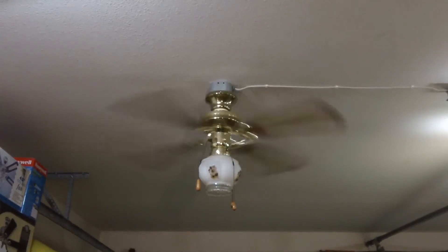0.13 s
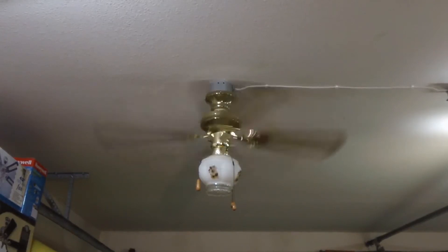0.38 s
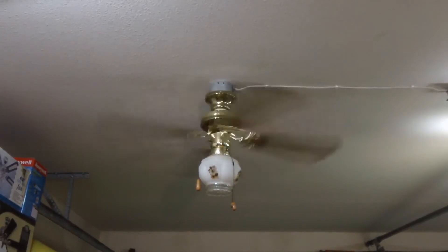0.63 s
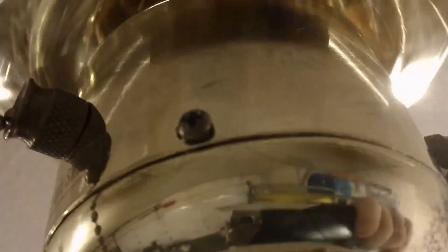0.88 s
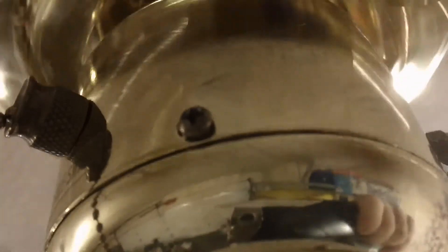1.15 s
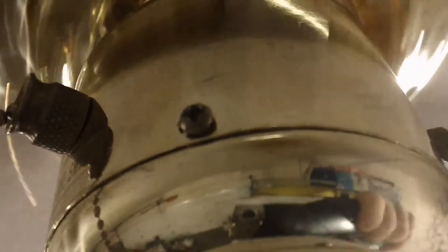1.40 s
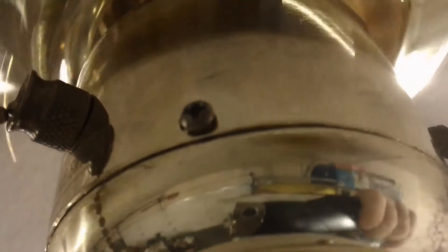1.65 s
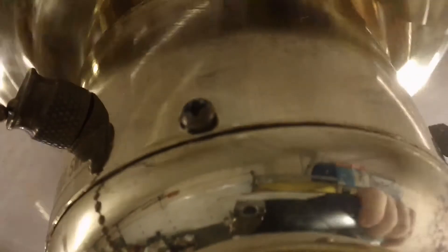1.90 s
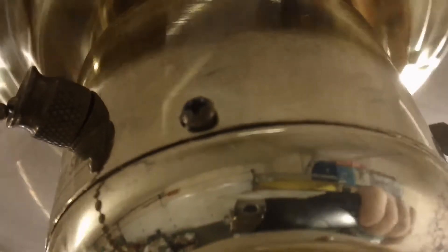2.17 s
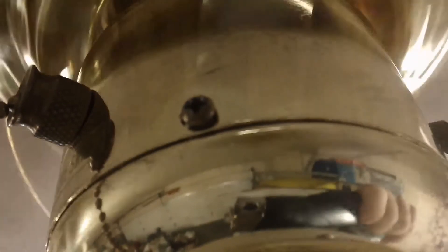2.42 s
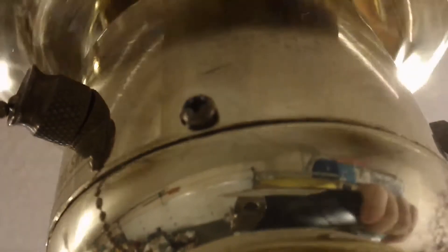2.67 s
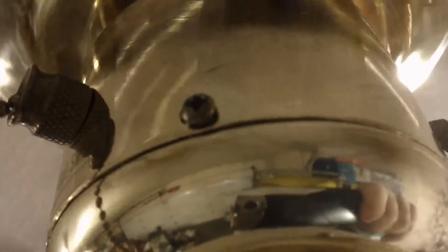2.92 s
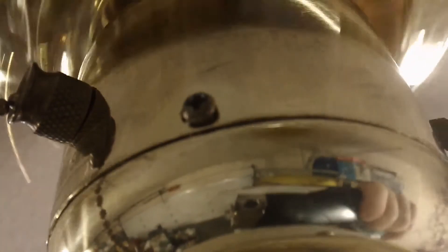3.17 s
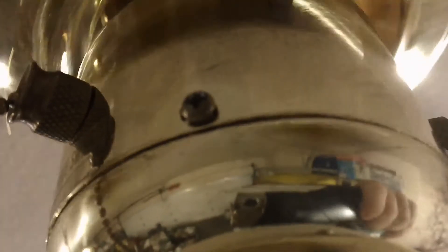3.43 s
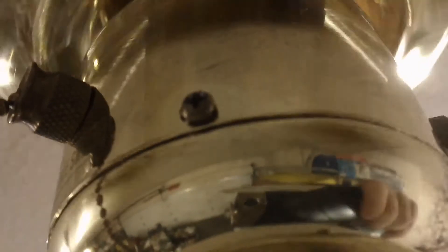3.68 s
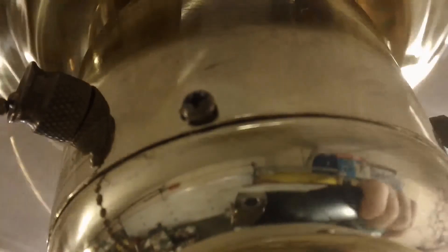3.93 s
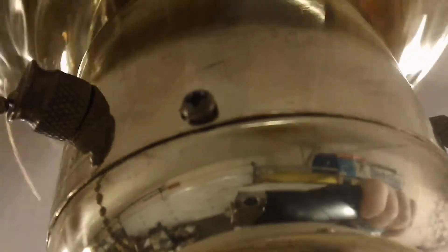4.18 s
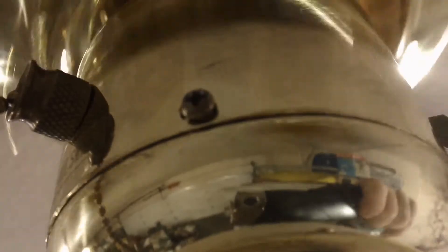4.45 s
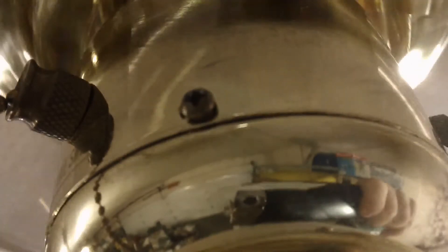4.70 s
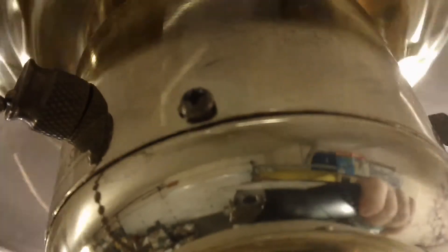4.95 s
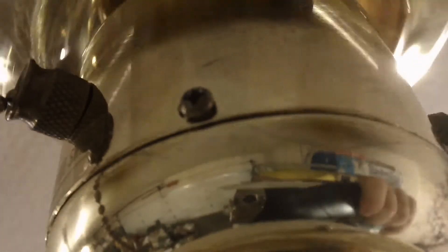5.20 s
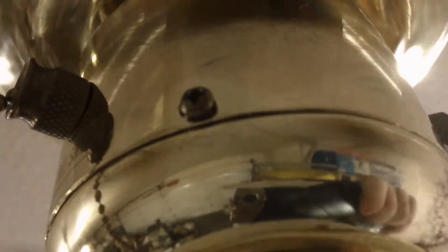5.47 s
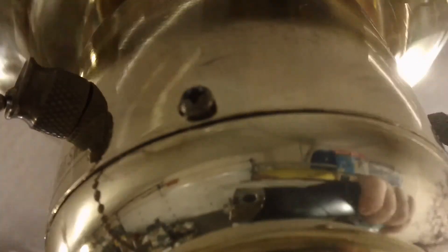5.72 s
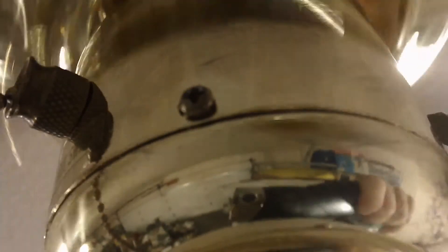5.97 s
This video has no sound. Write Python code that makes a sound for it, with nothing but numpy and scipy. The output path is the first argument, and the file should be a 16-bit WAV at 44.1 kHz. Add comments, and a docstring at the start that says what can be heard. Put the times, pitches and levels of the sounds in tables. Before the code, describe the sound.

Distant fan hiss, a short gap of silence, then a close motor hum swelling with each turn, with bearing rumble, small rattles and draught thumps.

```python
"""Ceiling fan, far and near

A ceiling fan is heard first from across the room, then, after a short silent gap, at its brass motor housing.
The windings hum at twice the mains rate, swelling once a turn up close; rotor slots and blades add lines.
Bearing noise rings the housing, shaped noise hisses as air, and short noise bursts make ticks and rattles.
Draughts buffet the microphone as gusty low noise with single thumps; faint hiss alone widens the stereo."""
import sys
import numpy as np
from scipy import signal
from scipy.fft import rfft, irfft, next_fast_len
from scipy.io import wavfile
from scipy.ndimage import uniform_filter1d

SR = 44100
rng = np.random.default_rng(int(sys.argv[2]) if len(sys.argv) > 2 else 0)


def materialize(psi):
    """Save the field psi as 16-bit PCM at rate SR to the path in sys.argv[1].

    A 1-D psi becomes a single channel; in a 2-D psi each row is a channel.
    """
    bounded = np.clip(np.atleast_2d(psi).T, -1, 1)
    quanta = np.round(bounded * 32767).astype(np.int16)
    wavfile.write(sys.argv[1], SR, quanta)


def ratio(d):
    """dB to gain"""
    e = np.asarray(d, float) / 20
    return 10 ** e


N = 268789  # length in samples

HUM_HZ, TURN_HZ, SLOT_HZ, BLADES = 119.92, 2.67, 142.26, 4
GAP_START_S, GAP_END_S = 0.618, 0.7653

# across the room: gains of air, hum and housing (dB)
FAR_AIR_DB, FAR_HUM_DB, FAR_HOUSING_DB = 2.5, -47, -9.5
# at the housing: settled gains (dB), then how far under them each starts (dB) and the rise time (s)
NEAR_AIR_DB, NEAR_HUM_DB, NEAR_HOUSING_DB = 2, -33, 0.22
FADE_AIR_DB, FADE_HUM_DB, FADE_HOUSING_DB, FADE_S = -10.5, -10.5, -9, 1.055


def level(x, db):
    """Set the rms level."""
    return x * ratio(db) / np.sqrt(np.mean(x ** 2))


def coloured(spectrum):
    """Noise shaped by a (Hz, dB) spectrum."""
    hz, db = np.transpose(spectrum)
    size = next_fast_len(N)
    log_hz = np.log(np.arange(size // 2 + 1) * SR / size + 1)
    shape = ratio(np.interp(log_hz, np.log(hz), db))
    return irfft(rfft(rng.standard_normal(size)) * shape, size)[:N]


def ring(x, hz, width_hz):
    """One resonance, gain 1 at its centre."""
    return signal.lfilter(*signal.iirpeak(hz, hz / width_hz, fs=SR), x)


def band(x, lo_hz, hi_hz):
    """Steep band-pass."""
    return signal.sosfilt(signal.butter(4, [lo_hz, hi_hz], "band", fs=SR, output="sos"), x)


def knock(noise, rise_s, fall_s):
    """A burst of noise with a soft rise and an exponential fall."""
    u = np.arange(len(noise)) / SR
    return noise * (1 - np.exp(-u / rise_s)) * np.exp(-u / fall_s)


def walk(rate):
    """Random levels held 1 / rate s and slewed twice; spread near 1."""
    k = int(SR / rate)
    steps = np.repeat(rng.standard_normal(N // k + 1), k)
    return 1.39 * uniform_filter1d(uniform_filter1d(steps, k), k)[:N]


def swell(t, depth, peak_s):
    """The unbalanced rotor leans towards the microphone once a turn."""
    return 1 + depth * np.cos(2 * np.pi * TURN_HZ * (t - peak_s))


def add(out, s, grain):
    """Mix a grain in from time s."""
    i = max(int(s * SR), 0)
    out[i:i + len(grain)] += grain[:len(out) - i]


# Hum overtones, levels relative to the hum gain.
# Columns: multiple, level_db, swell_depth (0-1, near only), swell_peak_s, waver_db
HUM_OVERTONES = [(1, 0.5, 0.3, 0.33, 0.9), (2, -13.5, 0.4, 0.27, 1.2), (4, -34, 0.55, 0.36, 2.5)]
# Rotor slot tone mixed with the hum, levels relative to the hum gain.
# Columns: hum_multiples_added, level_db, swell_depth (0-1)
SLOT_TONES = [(0, -30.5, 0), (1, -20, 0), (2, -22, 0.28), (3, -31.5, 0.37), (5, -37, 0.3), (7, -38, 0.05)]
# Third overtone, which drifts on its own, outside the hum gain. Columns: time_s, level_db
THIRD_OVERTONE = [(.77, -69), (1.75, -65), (2.4, -57), (3.2, -58), (3.8, -57), (4.3, -51.5), (4.8, -50),
                  (5.3, -54.5), (5.7, -66), (6.09, -62)]
BLADE_TONE_DB = -23.5  # relative to the hum gain
LEAD_RAD = 0.52  # each overtone runs this much further ahead of the trough
FAR_DULL_DB, FAR_SECOND_DB = -3, -8  # far loss of overtones and slot tones; extra loss of the second


def windings(t, cycle, near, hum_db):
    """Magnetic pull: overtones gather near the troughs, which come out sharp; slots and blades add lines."""
    dull_db = np.where(near, 0, FAR_DULL_DB)
    tone = np.zeros(N)
    for k, db, depth, peak_s, waver_db in HUM_OVERTONES:
        far_db = (k > 1) * dull_db + (k == 2) * ~near * FAR_SECOND_DB
        gain = ratio(db + far_db + waver_db * walk(9)) * swell(t, near * depth, peak_s)
        tone += gain * np.cos(k * cycle + (k - 1) * LEAD_RAD)
    slot = 2 * np.pi * SLOT_HZ * t
    for k, db, depth in SLOT_TONES:
        gain = ratio(db + dull_db + 1.4 * walk(12)) * swell(t, depth, 0.24)
        tone += gain * np.cos(slot + k * cycle)
    # blades passing put one line just above the hum
    tone += ratio(BLADE_TONE_DB) * np.cos(cycle + 2 * np.pi * BLADES * TURN_HZ * (t - 0.021))
    third_db = np.interp(t, *np.transpose(THIRD_OVERTONE)) + 2.2 * walk(9)
    third = ratio(third_db) * np.cos(3 * cycle + 2 * LEAD_RAD)
    return -np.sqrt(2) * (ratio(hum_db) * tone + third)


# Resonances of the brass shell. Column: pitch_hz
SHELL_HZ = [248, 269, 630, 742, 905, 1004, 1046, 1105, 1380, 1490, 1573, 1603, 1625, 2622]
# The same resonances in order, levels relative to the housing gain.
# Columns: width_hz, level_db, swell_depth (0-1)
SHELL_MODES = [(16, -56, 0), (12, -65.5, 0), (54, -70.5, 0.3), (40, -66.5, 0.5), (15, -72.5, 0),
               (9.95, -70, 0.7), (14, -70.5, 0.3), (50, -70, 0), (50, -66, 0), (50, -69, 0.08),
               (11, -69.5, 0.8), (10.04, -77.5, 0.3), (18, -76, 0.5), (6, -79.5, 0)]
# Spectrum shape of the broad rumble. Columns: pitch_hz, density_db (per Hz)
RUMBLE_SPECTRUM = [(90, -13.5), (180, -11.5), (300, -13.5), (600, -16), (1200, -19.5), (1700, -34),
                   (1900, -48.5), (2500, -58.5)]
RUMBLE_DB = -56  # rms before swell, waver and the housing gain


def housing(t, cycle):
    """Bearing noise, pulsed a little by the hum, rings the brass shell over a broad rumble."""
    drive = rng.standard_normal(N) * (1 + 0.33 * np.cos(cycle))
    shell = np.zeros(N)
    for hz, (width_hz, db, depth) in zip(SHELL_HZ, SHELL_MODES):
        shell += swell(t, depth, 0.33) * level(ring(drive, hz, width_hz), db)
    rumble = level(coloured(RUMBLE_SPECTRUM), RUMBLE_DB)
    return shell + swell(t, 0.21, 0.32) * ratio(0.7 * walk(6)) * rumble


# Spectrum shape of the blade hiss. Columns: pitch_hz, density_db (per Hz)
AIR_SPECTRUM = [(30, -22), (100, -2.5), (300, -1), (1000, -9), (2000, -13.5), (4000, -16.5), (8000, -20),
                (10000, -22.5), (12000, -34.5), (13000, -32.5), (14800, -22.5), (15300, -25)]
AIR_DB = -53.5  # rms before flicker and the air gain


def air(cycle):
    """Hiss of the blades, faintly buzzing with the hum and flickering."""
    buzz = 1 + 0.035 * np.cos(cycle)
    flicker_db = 0.5 * walk(5.18) + 0.83 * walk(24.98)
    return buzz * ratio(flicker_db) * level(coloured(AIR_SPECTRUM), AIR_DB)


# Spectrum shape of the stereo hiss. Columns: pitch_hz, density_db (per Hz)
SIDE_SPECTRUM = [(150, -34), (290, -13.5), (460, 3), (1250, -2), (1900, -1), (5000, 0), (10000, -4.5),
                 (11400, -3), (12600, -18.5), (15300, 2)]
SIDE_DB = -62.5  # rms before the air gain


def side_hiss():
    """Steady noise, added to the left and subtracted from the right for width."""
    return level(coloured(SIDE_SPECTRUM), SIDE_DB)


# Spectrum shape of the draught. Columns: pitch_hz, density_db (per Hz)
DRAUGHT_SPECTRUM = [(15, -40), (30, -13), (65, -3.5), (95, -3.5), (160, -5.5), (200, -11.5), (260, -27.5),
                    (400, -57.5)]
# Draught strength. Columns: time_s, gain_db
DRAUGHT_GUSTS = [(0, -73), (0.78, -67.5), (1.5, -58.5), (2.85, -52.5), (3.55, -67), (3.9, -57), (4.3, -61),
                 (4.67, -49.5), (5.1, -57), (5.85, -53), (6.09, -47.5)]


def draught(t):
    """Turbulent draught from the blades rumbles on the microphone in gusts."""
    gust_db = np.interp(t, *np.transpose(DRAUGHT_GUSTS)) + 2.3 * walk(16)
    return ratio(gust_db) * level(coloured(DRAUGHT_SPECTRUM), 4.2)


# Short rattles; knock level is set before the resonances.
# Columns: start_s, length_s, knock_db, low_resonance_db, high_resonance_db
RATTLE_EVENTS = [(.035, .03, -46, 2, -10), (1.17, .07, -53, -2, -10), (1.9166, .038, -33, 4, -1),
                 (4.052, .07, -37, -4, -5), (4.177, .03, -38, -2, -6), (4.377, .03, -38, -3, -4),
                 (4.485, .04, -36.5, -2, -4), (5.094, .048, -36, 0, -4), (5.178, .022, -38, 3, -10),
                 (5.21, .02, -38, -3, -2)]
# Low, middle and high resonances of the loose part. Columns: pitch_hz, width_hz
RATTLE_MODES = [(3700, 1200), (6000, 1500), (9900, 1600)]
RUSTLE_DB = -57  # before the resonances


def rattles():
    """A loose part knocks on every hum cycle for a moment, rustling between the knocks."""
    out = np.zeros(N)
    for s, length_s, db, low_db, high_db in RATTLE_EVENTS:
        size = int((length_s + 0.02) * SR)
        hits = ratio(RUSTLE_DB) * np.hanning(size) * rng.standard_normal(size)
        for k in range(int(length_s * HUM_HZ) + 1):
            burst = knock(rng.standard_normal(300), 0.0005, 0.0014)
            add(hits, k / HUM_HZ, ratio(db + 1.2 * rng.standard_normal()) * burst)
        for (hz, width_hz), mode_db in zip(RATTLE_MODES, (low_db, -3, high_db)):
            add(out, s, ratio(mode_db) * ring(hits, hz, width_hz))
    return band(out, 2600, 10800)


# Runs of evenly spaced ticks, about one run a turn. Columns: first_s, tick_count, spacing_s
TICK_TIMES = [(.0623, 3, .0551), (.3401, 3, .0559), (.8131, 4, .0613), (1.1653, 2, .0681),
              (1.4092, 2, .0554), (1.6332, 4, .0585), (1.985, 4, .0604), (2.3501, 4, .0557),
              (2.6863, 3, .0568), (2.8784, 1, 0), (3.0455, 2, .0623), (3.3837, 4, .0567), (3.7519, 4, .064),
              (4.1165, 1, 0), (4.4423, 1, 0), (4.5855, 2, .0608), (4.8349, 3, .0562), (5.248, 3, .0582),
              (5.5523, 2, .0718), (5.8696, 4, .0608)]
TICK_DB, TICK_SCATTER_DB = -44.5, 1.0  # peak before the air gain, and its random spread
TICK_LOW_HZ, TICK_HIGH_HZ = 4500, 8500  # range of the bright centre


def ticks():
    """A loose part ticks: each is a millisecond or two of treble with a brighter centre."""
    out = np.zeros(N)
    for first_s, count, spacing_s in TICK_TIMES:
        for k in range(count):
            burst = knock(rng.standard_normal(400), 0.00079, 0.0012)
            hz = rng.uniform(TICK_LOW_HZ, TICK_HIGH_HZ)
            burst = burst + 0.37 * ring(burst, hz, 1500) + 0.5 * ring(burst, 3500, 630)
            burst = band(burst, 2700, 9500)
            gain = ratio(TICK_DB + TICK_SCATTER_DB * rng.standard_normal())
            add(out, first_s + k * spacing_s, gain * burst / np.abs(burst).max())
    return out


# Thumps of air on the microphone; level is the peak of the main wave.
# Columns: centre_s, level_db, pitch_hz, spread_ms (standard deviation of the bell-shaped envelope)
AIR_THUMPS = [(1.274, -38, 80, 7.1), (1.561, -39, 110, 8), (1.923, -24.5, 86, 2.9), (2.248, -44, 95, 6),
              (2.707, -35, 90, 6.5), (2.865, -31, 70, 7.4), (2.905, -38, 90, 4.9), (3.133, -31, 70.4, 7.5),
              (3.847, -40, 90, 5.9), (4.836, -42, 80, 7.7), (5.227, -39, 70, 6.5), (5.508, -36, 79, 6.9),
              (6.041, -37, 85, 8.7)]


def buffets():
    """The strongest eddies of the draught are dull thumps of a cycle or so with a tighter edge."""
    out = np.zeros(N)
    u = np.arange(-2000, 2000) / SR
    for s, db, hz, spread_ms in AIR_THUMPS:
        bell = np.exp(-0.5 * (1000 * u / spread_ms) ** 2)
        wave = np.cos(2 * np.pi * hz * u) + 0.41 * np.sin(2 * np.pi * 2.2 * hz * u)
        add(out, s + u[0], -ratio(db) * bell * wave)
    return out


def scene():
    """Both views, a silent gap between them; only faint hiss differs left and right."""
    t = np.arange(N) / SR
    near = t > GAP_END_S
    fading = np.clip(1 - (t - GAP_END_S) / FADE_S, 0, 1)  # 1 as the near view opens, 0 once settled
    air_db = np.where(near, NEAR_AIR_DB + FADE_AIR_DB * fading, FAR_AIR_DB)
    hum_db = np.where(near, NEAR_HUM_DB + FADE_HUM_DB * fading, FAR_HUM_DB)
    housing_db = np.where(near, NEAR_HOUSING_DB + FADE_HOUSING_DB * fading, FAR_HOUSING_DB)
    cycle = 2 * np.pi * HUM_HZ * (t + 0.00628)  # hum phase in radians
    mid = windings(t, cycle, near, hum_db) + ratio(housing_db) * housing(t, cycle)
    mid += ratio(air_db) * (air(cycle) + ticks())
    mid += draught(t) + rattles() + buffets()
    side = ratio(air_db) * side_hiss()
    # the far view closes over 11 ms; the near view opens at once
    gate = np.clip((GAP_START_S - t) / 0.011 + 0.5, 0, 1) + near
    return gate * np.array([mid + side, mid - side])


def roll_off(x):
    """The treble ends steeply here."""
    return signal.sosfilt(signal.butter(12, 16510, fs=SR, output="sos"), x)


DARK_LOW_HZ, DARK_HIGH_HZ, TOP_HZ = 12370, 12750, 15290


def record(dry):
    """A filter cuts a narrow dark band high up and a hard top edge."""
    hz = np.arange(N // 2 + 1) * SR / N
    recovery_db = np.interp(hz, [DARK_HIGH_HZ, DARK_HIGH_HZ + 550], [-10, 0])
    dark_db = np.where(hz < DARK_LOW_HZ, 0, np.where(hz < DARK_HIGH_HZ, -50, recovery_db))
    response_db = np.where(hz < TOP_HZ, dark_db, -60)
    mix = irfft(rfft(dry) * ratio(response_db), N)
    return roll_off(mix)


dry = scene()
out = record(dry)
materialize(out)
```